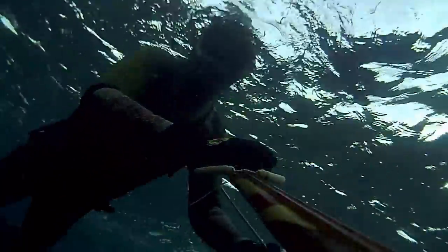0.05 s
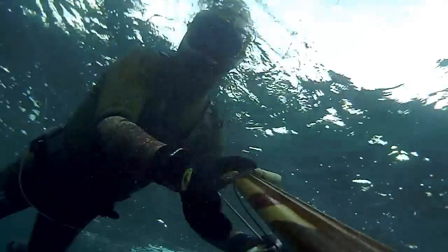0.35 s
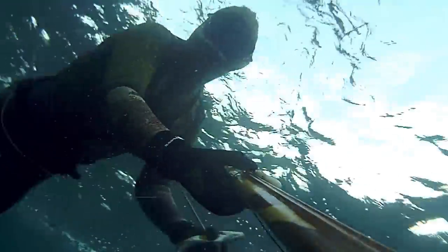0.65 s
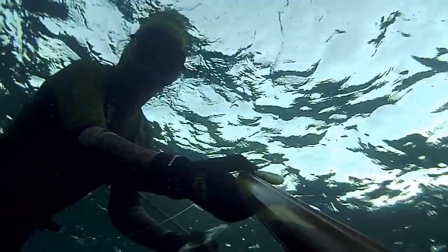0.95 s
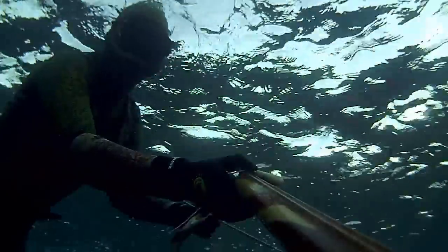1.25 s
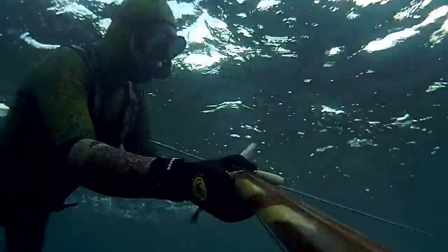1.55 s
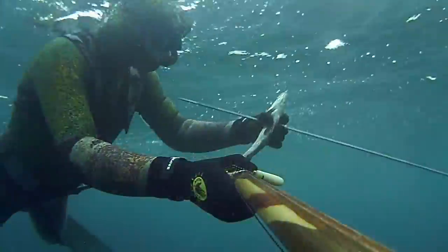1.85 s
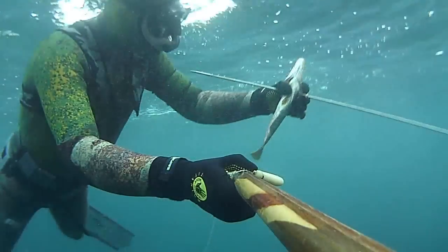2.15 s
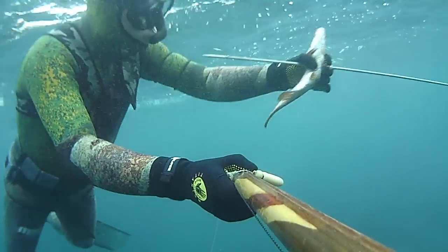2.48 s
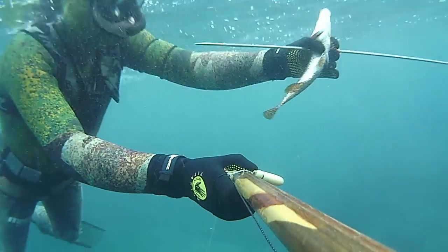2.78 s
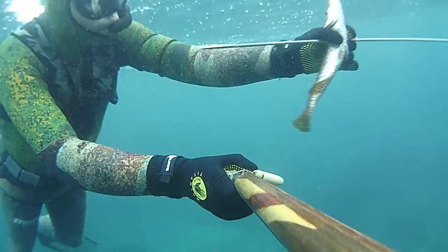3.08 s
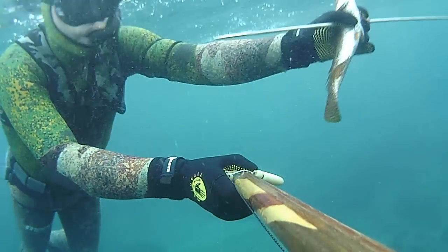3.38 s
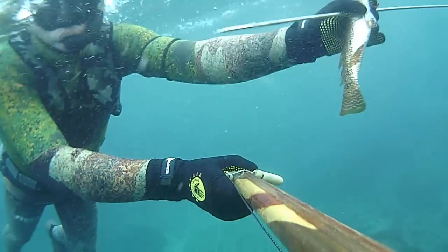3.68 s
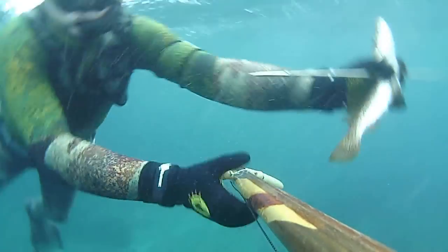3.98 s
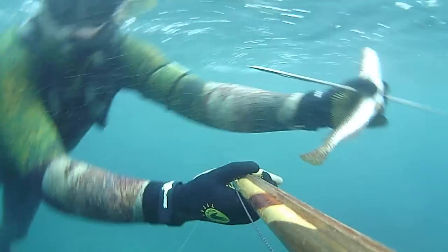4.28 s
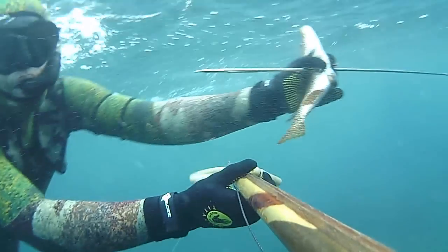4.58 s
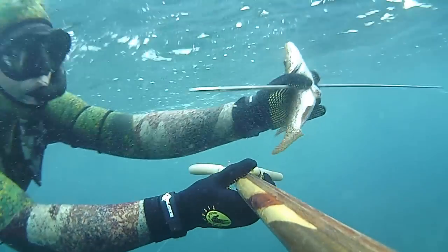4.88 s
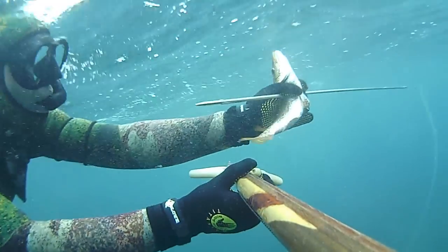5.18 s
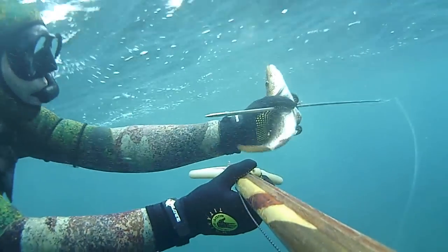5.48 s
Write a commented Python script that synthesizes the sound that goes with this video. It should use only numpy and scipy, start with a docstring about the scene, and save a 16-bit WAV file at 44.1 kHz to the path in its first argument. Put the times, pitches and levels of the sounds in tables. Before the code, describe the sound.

Deep underwater rumble with dull knocks and rubber squeaks from a handled speargun, a single loud click midway, faint ticks and hum.

```python
"""Under water, inside a camera housing fixed to a wooden speargun.
The stock sways and flexes with a deep rumble; a glove and line rub, squeak and knock on it, ringing
its modes, and one hard snap overloads the microphone. Behind it the sea hisses and ticks through the
housing's resonances, with a faint wavering hum like a far motor."""
import sys
import numpy as np
from scipy import signal
from scipy.fft import rfft, irfft
from scipy.io import wavfile

SR = 44100
rng = np.random.default_rng(int(sys.argv[2]) if len(sys.argv) > 2 else 0)


def generate_wav(signal):
    """Clip the signal to [-1, 1] and save it as 16-bit WAV at the path in sys.argv[1]."""
    frames = np.transpose(np.atleast_2d(signal))
    scaled = np.clip(frames, -1, 1) * 32767
    pcm = np.round(scaled).astype(np.int16)
    wavfile.write(sys.argv[1], SR, pcm)


N = 252948
T = np.arange(N) / SR

# slow pushes of the arm that sway the gun: crest_s, level_db, swell_s, fade_s
ARM_PUSHES = [(0.02, -6, 0.035, .044), (0.256, -10, 0.098, .1), (0.455, -12, 0.064, .073),
              (0.739, -8, 0.086, .076), (1.189, -13.5, 0.13, .095), (1.46, -14.3, 0.085, .16),
              (1.89, -22.5, 0.091, .18), (2.387, -31, 0.057, 0.077), (3.13, -25, 0.19, .15),
              (3.63, -32.5, .09, .33), (4.5, -16, 0.12, .033), (4.609, -7.6, 0.053, .052),
              (4.818, -15.9, .1, .122), (5.18, -23.5, 0.11, .24)]
# shifts of the grip that flex the gun, damped by the hand: start_s, rise_s, flex_db, shudder_db, t60_s
GRIP_SHIFTS = [(0.0, 0.012, -28.5, -26.5, 1.3), (0.25, 0.21, -31, -29, 3.8), (0.58, 0.12, -16.5, -27, 0.86),
               (0.98, 0.07, -18.5, -22.5, .57), (1.04, .08, -16.5, -39, 1.1), (1.55, .25, -42.5, -51, 2.7),
               (3.86, .035, -37.5, -51.5, 2.2), (4.08, 0.068, -19.5, -47, 1.37),
               (4.19, .035, -19.5, -27.5, 1.1), (4.36, .3, -25.5, -35, 0.44),
               (4.66, 0.083, -36.5, -34, 0.48), (4.92, 0.14, -42, -45.5, 0.59),
               (5.2, 0.27, -52, -51.5, 1.6)]
# slow surge of water past the housing: time_s, level_db
SURGE_CURVE = [(0.0, -26.5), (0.21, -41.5), (1.56, -21.5), (2.51, -41.5), (2.89, -25), (3.24, -35.5),
               (4.52, -38), (4.58, -25.5), (5.74, -48.5)]
# rubbing strokes: start_s, attack_s, length_s, mid_stroke_db, swell_db, weight_db, rasp_db
RUB_STROKES = [(0.115, .012, 0.058, -37.5, 5, -1, -15), (0.242, 0.0057, .054, -32.5, 11, -6, -15),
               (0.324, .002, .055, -42, -5, 4, -10), (0.652, 0.0029, 0.083, -32, -1, 3, -19),
               (0.738, .003, 0.032, -31, 4, 8.5, -14), (0.841, .003, 0.1, -27.5, 5, 4.5, -23),
               (1.014, .001, 0.015, -25, -1, 6, -24), (1.055, .0004, .053, -19, -0.5, 2, -29),
               (4.153, .005, 0.087, -46, 3, 6.5, -12), (4.322, .003, 0.034, -50.5, -4.5, 3, -11.5),
               (4.432, 0.0033, .052, -37, 8.5, -2.5, -8.5), (4.539, 0.0068, 0.033, -36.5, 2.5, 1, -19),
               (4.585, .001, 0.024, -30, -1, -5.5, -22), (4.638, .001, 0.015, -30.5, -5.5, -0.5, -22),
               (4.663, .004, 0.075, -43.5, -5, 5, -13), (5.013, 0.0081, 0.06, -43, 3.5, 2.5, -22),
               (5.495, 0.0056, .033, -42, -0.5, 3, -22), (5.562, .006, .11, -42, -2, 2.5, -22)]
# rubber glove squeaks: crest_s, peak_db, width_s, pitch_hz
GLOVE_SQUEAKS = [(0.667, -23, 0.0092, 1835), (0.76, -17, 0.015, 692), (0.761, -22.5, 0.0094, 818),
                 (1.099, -14, 0.0053, 1370), (4.482, -25.5, 0.0031, 1395), (4.586, -18, 0.0058, 1396),
                 (4.603, -30.5, 0.0085, 1400), (4.639, -21, 0.0043, 1385), (5.567, -31.5, 0.0097, 1410),
                 (5.617, -31, 0.0093, 1410)]
# knocks on the gun: start_s, heavy_db, light_db, chatter_s, loss_per_contact_db
GUN_KNOCKS = [(0.742, -16, -25, .02, -2.5), (1.014, -15, -22.5, .02, 6.5), (1.054, -11.5, -15.5, .062, 1),
              (3.863, -28, -29, .005, 0), (4.046, -31, -35, .005, 0), (4.079, -19.5, -21, .047, 4),
              (4.204, -26, -24, .005, 0), (4.231, -29, -33.5, .005, -1)]
# padded bumps on gun and housing: start_s, peak_db, contact_s, pitch_hz
SOFT_BUMPS = [(0.322, -17.5, 0.0037, 542), (0.936, -27.5, 0.018, 231), (1.06, -21.5, .015, 226.3),
              (3.866, -37, 0.0039, 230), (2.73, -38, .01, 560), (3.028, -24.5, 0.0067, 555.5),
              (3.63, -31, 0.028, 552.5), (4.09, -31, 0.029, 226.7), (4.205, -23, 0.0013, 352),
              (4.229, -25, 0.0018, 241), (4.424, -31.5, 0.0026, 235), (4.576, -29, .03, 231.5),
              (4.733, -30.5, 0.014, 542), (4.987, -15.5, 0.0018, 553)]
# heavy and light modes of gun and mount, and the rasp of a rough surface: pitch_hz, width_hz, gain_db
HEAVY_MODES = [(228.4, 11, -9), (375, 20, -8), (478, 44, -8.5), (539.6, 33.4, -0.5), (681.7, 36, -1),
               (720, 40, -6), (826, 52, -19), (960, 40, -19)]
LIGHT_MODES = [(1146, 43, -5.5), (1217, 55, -4), (1380.5, 42.2, 2), (1741, 38, -2.5), (1880, 70, -10),
               (2565, 170, -21), (3160, 690, -35)]
RASP_BANDS = [(2670, 610, 0.5), (3280, 680, -3)]
# what the hard snap and its rebound set ringing: pitch_hz, level_db, t60_s
SNAP_RING = [(1420, -18.5, 0.045), (1703, 3, 0.027), (2527, -11.5, 0.023), (3500, -7, 0.011)]
REBOUND_RING = [(83, -31.5, 1.4), (301.6, -24, 0.18), (409, -21, .11), (470, -26, 0.066), (558, -6, 0.098),
                (645, -3.5, 0.04), (813, -39, 0.13), (965, -12, 0.063)]
# the sea's background hiss: time_s, wash_db, fizz_db
SEA_CURVE = [(0, -33.5, -46.5), (0.6, -27.5, -48), (0.95, -30, -49.5), (1.15, -37, -53),
             (1.75, -36.5, -54.5), (2.8, -41.5, -55.5), (3.45, -47.5, -61.5), (3.95, -47, -63),
             (4.25, -43.5, -57.5), (4.85, -46, -60), (5.45, -42, -57), (5.74, -48, -57)]
# the nearer ticks in the water: start_s, body_db, edge_db
NEAR_TICKS = [(0.3184, -26.5, -47.5), (1.4222, -33.5, -52), (1.4834, -31, -61), (1.7777, -35, -50.5),
              (1.8422, -35, -61), (2.515, -43.5, -51), (2.579, -49.5, -51.5), (2.9633, -38.5, -53.5),
              (3.041, -37, -53), (3.0956, -38.5, -50), (3.1276, -30.5, -50), (3.136, -34, -46),
              (3.266, -33, -59), (3.7574, -34, -48), (3.944, -37, -70), (4.989, -27, -65),
              (5.1696, -34, -54)]
# housing walls as rung by wash, fizz, tick bodies and tick edges: pitch_hz, width_hz, gain_db
WALL_WASH_MODES = [(213, 44, -18), (490, 70, -10), (544, 13, 3.5), (652, 75, -15.5)]
WALL_FIZZ_MODES = [(906, 7.4, -8.5), (1225.5, 55, 0.5), (1750, 90, 0.5), (1991, 110, -1.5),
                   (2420, 160, -9.5), (3760, 1500, -15.5)]
WALL_TICK_MODES = [(1250, 280, -17), (1874, 87, 7.5)]
WALL_EDGE_MODES = [(2550, 150, -4), (3246, 540, -1.5)]
# the motor-like hum: time_s, fundamental_hz, level_db
HUM_CURVE = [(0, 109.3, -38), (0.6, 107.8, -35), (1.2, 103.4, -41), (1.42, 106.7, -41), (1.6, 104.5, -42),
             (2.05, 110, -42), (2.7, 106.5, -47), (3.5, 108, -60), (4.25, 107.3, -48), (5.0, 103.5, -52),
             (5.74, 102.5, -52)]
# its overtones: harmonic_number, level_db
HUM_HARMONICS = [(4, -14), (5, -10), (6, 0)]

SWAY_HZ, FLEX_HZ, SHUDDER_HZ = 32.3, 81.2, 104.4  # the gun's bending modes
SHUDDER_T60_SHARE, SHUDDER_REST_DB = .8, -62.5  # shorter than the flex, yet never quite still
RUB_RELEASE_S, CHATTER_GAP_S = .0065, .0135
SNAP_S, REBOUND_S = 2.8458, 2.8490
FAR_TICKS_PER_S, FAR_BODY_DB, FAR_EDGE_DB, FAR_SPREAD_DB = 3, -48, -61, 3
MUFFLE_CUT_HZ = 3650  # steep treble cut that muffles everything but the snap
SOFT_CEILING, PORT_LAG_S = .8, .00012
MIC_DULL_HZ, CUTOFF_HZ = 13000, 16000


def gun_rumble():
    """Pushes sway the stock and shed eddies, water surges past, and grip shifts ring two faster modes."""
    push = np.max([from_db(db) * bell(crest_s, np.where(T < crest_s, swell_s, fade_s))
                   for crest_s, db, swell_s, fade_s in ARM_PUSHES], axis=0)
    sway = push * bending_mode(SWAY_HZ, wander_hz=1.9, rate_hz=4, flutter_db=.6)
    surge_db, = curves(SURGE_CURVE)
    surge = from_db(surge_db + 2.5) * unit_rms(cut(cut(noise(), 15.7, "low", order=3), 3.5, "high"))
    eddies = from_db(-16) * push * unit_rms(cut(cut(noise(), 62, "low", order=5), 40, "high"))
    flex_size, shudder_size = np.zeros((2, N))
    for start_s, rise_s, flex_db, shudder_db, t60_s in GRIP_SHIFTS:
        flex_size = np.maximum(flex_size, from_db(flex_db) * rise_and_decay(start_s, rise_s, t60_s))
        jolt = from_db(shudder_db) * rise_and_decay(start_s, rise_s, SHUDDER_T60_SHARE * t60_s)
        shudder_size = np.maximum(shudder_size, jolt)
    shudder_size += from_db(SHUDDER_REST_DB)
    flex = flex_size * bending_mode(FLEX_HZ, wander_hz=1.2, rate_hz=5, flutter_db=.8)
    shudder = shudder_size * bending_mode(SHUDDER_HZ, wander_hz=5, rate_hz=18, flutter_db=1.5)
    return sway + surge + eddies + flex + shudder


def bending_mode(hz, wander_hz, rate_hz, flutter_db):
    """A mode of the stock kept going by uneven pushes, so that pitch and level waver."""
    phase = 2 * np.pi * np.cumsum(hz + wander_hz * drift(rate_hz)) / SR
    return unit_rms(np.sin(phase) * from_db(flutter_db * drift(rate_hz)))


def rubbing():
    """Stick-slip sends tiny jolts into the gun; each stroke grips, swells or fades, and lets go."""
    light, heavy, rough = np.zeros((3, N))
    for start_s, attack_s, length_s, db, swell_db, weight_db, rasp_db in RUB_STROKES:
        age = T - start_s
        gate = np.exp(np.minimum(age, 0) / attack_s - np.maximum(age - length_s, 0) / RUB_RELEASE_S)
        force = gate * from_db(db + swell_db * (np.clip(age / length_s, 0, 1) - .5))
        light += force
        heavy += force * from_db(weight_db)
        rough += force * from_db(rasp_db)
    slips = unit_rms(grains(per_s=2000, spread_db=.5) * from_db(2 * drift(110)))
    body = from_db(.5) * colour(slips * heavy, HEAVY_MODES)
    scrape = from_db(4) * colour(slips * light, LIGHT_MODES)
    rasp = from_db(2) * colour(slips * rough, RASP_BANDS)
    return body + scrape + rasp


def glove_squeaks():
    """Where the rubber's slips fall into step, one mode sings for a moment."""
    wobbly_time = np.cumsum(1 + .014 * drift(70)) / SR
    return sum(from_db(db) * bell(crest_s, width_s) * np.sin(2 * np.pi * hz * wobbly_time)
               for crest_s, db, width_s, hz in GLOVE_SQUEAKS)


def knocks():
    """Short gritty contacts, single or in a chattering run, ring the gun's heavy and light modes."""
    heavy_hits, light_hits = [], []
    for start_s, heavy_db, light_db, chatter_s, loss_db in GUN_KNOCKS:
        for k in range(1 + int(chatter_s / CHATTER_GAP_S)):
            contact_s = start_s + k * CHATTER_GAP_S
            heavy_hits.append((contact_s, heavy_db - k * loss_db))
            light_hits.append((contact_s, light_db - k * loss_db))
    thud = strike(heavy_hits, HEAVY_MODES, vary_db=3, grit=.5, grit_s=.0057)
    clack = strike(light_hits, LIGHT_MODES, vary_db=1, grit=.99, grit_s=.0042)
    return from_db(1.5) * thud + from_db(7.5) * clack


def bumps():
    """Padded contacts swell into a single mode and die away."""
    out = np.zeros(N)
    for start_s, db, contact_s, hz in SOFT_BUMPS:
        age = np.maximum(T - start_s, 0)
        swell = (1 - np.exp(-age / contact_s)) * np.exp(-age / (.009 + .5 * contact_s))
        out += from_db(db) * swell / swell.max() * np.sin(2 * np.pi * hz * age)
    return out


def hard_snap():
    """A hard contact rings high, its rebound rings low, and loose parts chatter briefly."""
    fade = (T > REBOUND_S) * np.exp(-np.abs(T - REBOUND_S) / .0041)
    chatter = from_db(-15.5) * colour(fade * noise(), LIGHT_MODES)
    return ring(SNAP_S, SNAP_RING) + ring(REBOUND_S, REBOUND_RING) + chatter


def snap_crack(width_s=.0009, top_hz=6300):
    """Two brief bright bursts of overload crackle on the snap, the same in both channels."""
    bursts = sum(bell(start_s + 1.5 * width_s, width_s) for start_s in (SNAP_S, REBOUND_S))
    return from_db(-31.5) * bursts * unit_rms(cut(noise(), top_hz, "low", order=4))


def sea():
    """Surface wash and fine crackle, coloured by the housing walls, over a low murmur."""
    wash_db, fizz_db = curves(SEA_CURVE)
    wash = from_db(wash_db) * colour(noise(), WALL_WASH_MODES)
    murmur = from_db(wash_db - 15) * unit_rms(cut(noise(), 580, "low"))
    crackle = unit_rms(noise() + .5 * grains(per_s=500, spread_db=5))
    fizz = from_db(fizz_db + 5.5) * colour(crackle, WALL_FIZZ_MODES)
    return wash + murmur + fizz


def water_ticks():
    """Tiny snaps in the water ring the housing, dull or bright: near ones on cue, far ones at random."""
    ticks = list(NEAR_TICKS)
    for _ in range(int(FAR_TICKS_PER_S * T[-1])):
        start_s = rng.uniform(0, T[-1] - .1)
        body_db, edge_db = rng.uniform(-FAR_SPREAD_DB, FAR_SPREAD_DB, 2) + (FAR_BODY_DB, FAR_EDGE_DB)
        ticks.append((start_s, body_db, edge_db))
    body = strike([(s, db) for s, db, _ in ticks], WALL_TICK_MODES, vary_db=0, grit=1.5, grit_s=.002)
    edge = strike([(s, db) for s, _, db in ticks], WALL_EDGE_MODES, vary_db=2.5, grit=4.3, grit_s=.0015)
    return from_db(3) * body + from_db(17) * edge


def far_hum():
    """A motor-like drone: three harmonics near the housing's resonance waver and fade."""
    hz, level_db = curves(HUM_CURVE)
    phase = 2 * np.pi * np.cumsum(hz * (1 + .002 * drift(8))) / SR
    drone = sum(from_db(db + 2 * drift(5)) * np.sin(k * phase) for k, db in HUM_HARMONICS)
    return from_db(level_db) * np.sqrt(2) * drone


def strike(hits, modes, vary_db, grit, grit_s):
    """Hits (start_s, level_db) ring a body; each skids briefly and stirs the modes unevenly by vary_db."""
    times, levels = np.transpose(hits)
    scatter_db = vary_db * rng.standard_normal((len(times), len(modes)))
    age = np.arange(SR // 20) / SR
    skids = rng.standard_normal((len(times), len(age))) * np.exp(-age / grit_s)
    skids *= grit / np.linalg.norm(skids, axis=1, keepdims=True)
    skids[:, 0] += 1  # the clean impact ahead of the grit
    out = np.zeros(N)
    for k, mode in enumerate(modes):
        force = np.zeros(N)
        for at, db, skid in zip((times * SR).astype(int), levels + scatter_db[:, k], skids):
            force[at:at + len(skid)] += from_db(db) * skid
        out += (-1) ** k * resonate(force, [mode])
    impulse_peak = np.abs(resonate(signal.unit_impulse(SR // 20), modes)).max()
    return out / impulse_peak / np.hypot(1, grit)


def resonate(force, modes):
    """Parallel resonances of alternating sign."""
    out = 0
    for k, (hz, width_hz, db) in enumerate(modes):
        r = np.exp(-np.pi * width_hz / SR)
        poles = [1, -2 * r * np.cos(2 * np.pi * hz / SR), r * r]
        band = (1 - r * r) / 2 * signal.lfilter([1, 0, -1], poles, force + 1e-18)
        out += (-1) ** k * from_db(db) * band
    return out


def colour(force, modes):
    """A resonant body that passes a white force at unchanged rms."""
    return resonate(force, modes) / np.linalg.norm(resonate(signal.unit_impulse(SR // 5), modes))


def ring(start_s, modes):
    """Decaying sines set off together."""
    age = np.maximum(T - start_s, 0)
    return sum(from_db(db - 60 * age / t60_s) * np.sin(2 * np.pi * hz * age) for hz, db, t60_s in modes)


def grains(per_s, spread_db):
    """Random clicks of uneven size and sign, rms 1."""
    sizes = from_db(spread_db * np.minimum(rng.exponential(1, N), 4))
    signs = rng.choice([-1, 1], N)
    return unit_rms(sizes * signs * (rng.random(N) < per_s / SR))


def drift(rate_hz):
    """Smooth random wander with spread 1."""
    hop, run_in = 40, 2000
    r = np.exp(-2 * np.pi * rate_hz * hop / SR)
    steps = rng.standard_normal(N // hop + run_in + 2)
    slow = signal.lfilter([1], [1, -2 * r, r * r], steps)[run_in:]
    return np.interp(np.arange(N) / hop, np.arange(len(slow)), unit_rms(slow))


def rise_and_decay(start_s, rise_s, t60_s):
    """An envelope that ramps to one and dies away."""
    age = T - start_s
    return np.clip(age / rise_s, 0, 1) * from_db(-60 * np.maximum(age - rise_s, 0) / t60_s)


def bell(crest_s, width_s):
    """A Gaussian swell."""
    return np.exp(-.5 * ((T - crest_s) / width_s) ** 2)


def curves(rows):
    """Each column of a breakpoint table at every sample."""
    times, *columns = np.transpose(rows)
    return [np.interp(T, times, column) for column in columns]


def cut(x, hz, kind, order=2):
    """Butterworth filter."""
    return signal.sosfilt(signal.butter(order, hz, kind, fs=SR, output="sos"), x + 1e-18)


def noise():
    """White noise, rms 1."""
    return rng.standard_normal(N)


def unit_rms(x):
    """Scale to rms 1."""
    return x / np.sqrt(np.mean(x ** 2) + 1e-20)


def from_db(db):
    """Decibels to gain."""
    return 10 ** (np.asarray(db) / 20)


def scene():
    """All but the snap is soft-clipped and muffled; the left port hears the housing a little late."""
    handling = gun_rumble() + rubbing() + glove_squeaks() + knocks() + bumps()
    shaking = handling + sea() + water_ticks() + far_hum()
    rounded = shaking / (1 + (shaking / SOFT_CEILING) ** 8) ** (1 / 8)
    inside = cut(rounded, MUFFLE_CUT_HZ, "low", order=26) + hard_snap()
    inside *= np.clip(np.minimum(T, T[-1] - T) / .004, 0, 1)  # 4 ms fades at both ends
    bin_hz = np.arange(N // 2 + 1) * SR / N
    left = irfft(rfft(inside) * np.exp(-2j * np.pi * bin_hz * PORT_LAG_S), N)
    return np.array([left, inside]) + snap_crack()


def record(dry):
    """The microphone clips hard at full scale, dulls the top and adds faint hiss under a steep cut."""
    overloaded = cut(np.clip(dry, -1, 1), MIC_DULL_HZ, "low", order=3)
    return cut(overloaded + from_db(-101) * noise(), CUTOFF_HZ, "low", order=12)


dry = scene()
out = record(dry)
generate_wav(out)
```